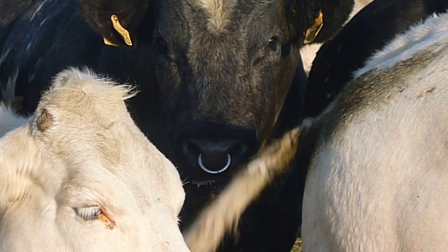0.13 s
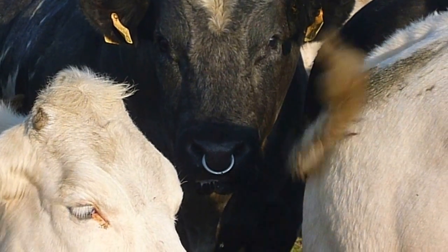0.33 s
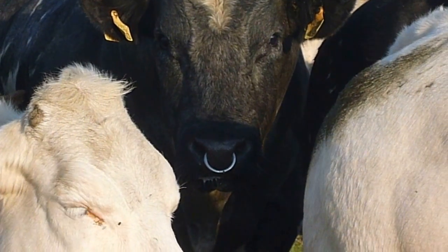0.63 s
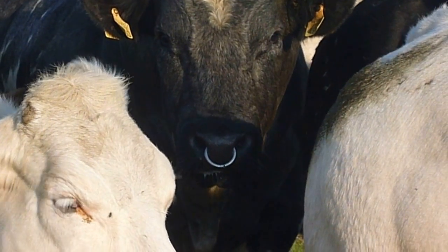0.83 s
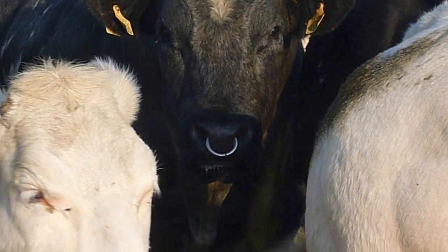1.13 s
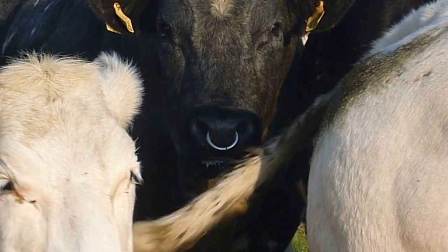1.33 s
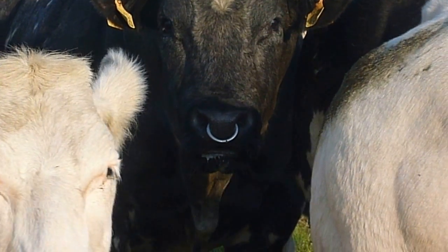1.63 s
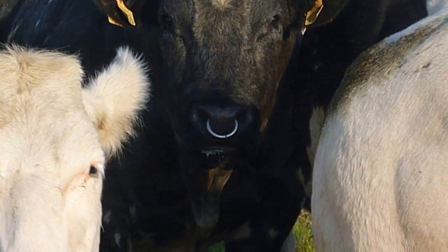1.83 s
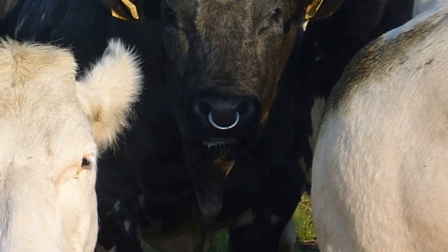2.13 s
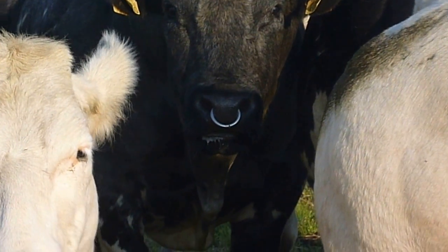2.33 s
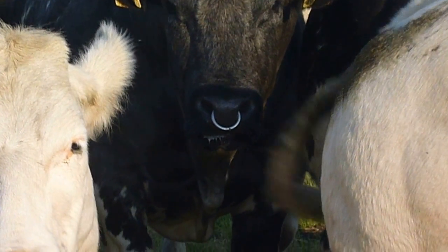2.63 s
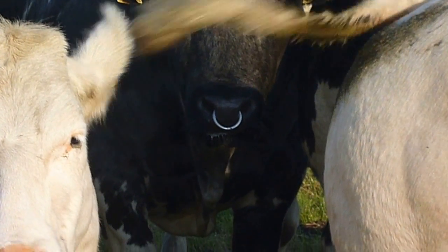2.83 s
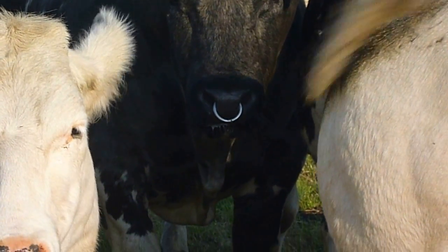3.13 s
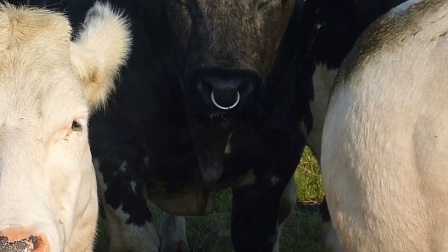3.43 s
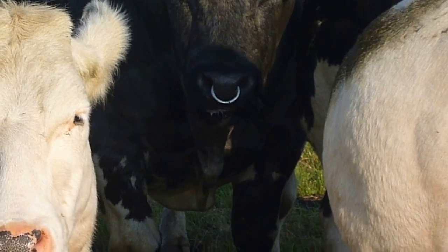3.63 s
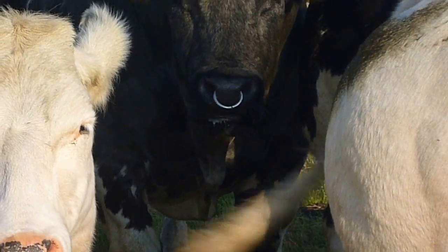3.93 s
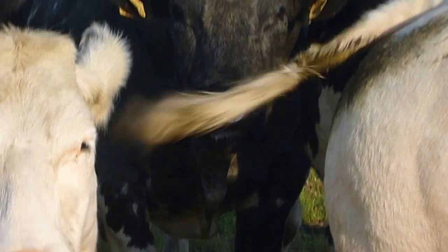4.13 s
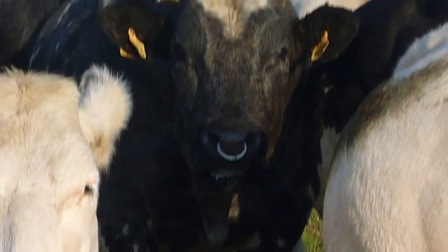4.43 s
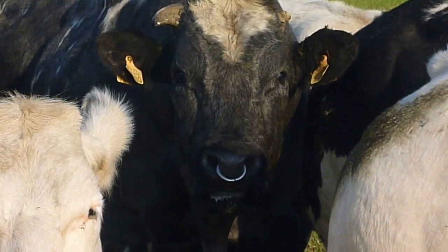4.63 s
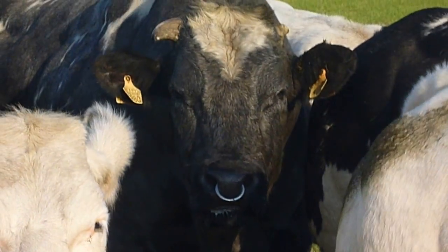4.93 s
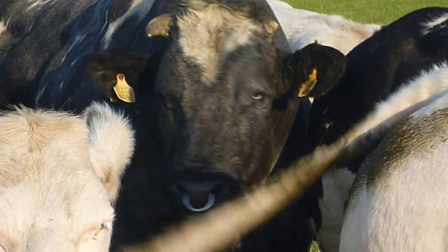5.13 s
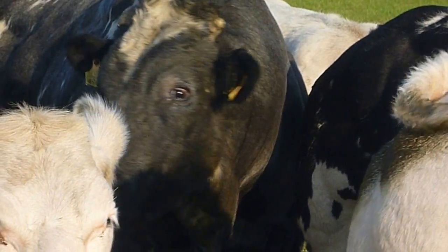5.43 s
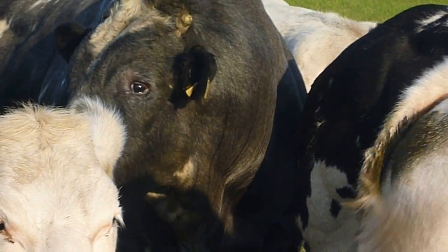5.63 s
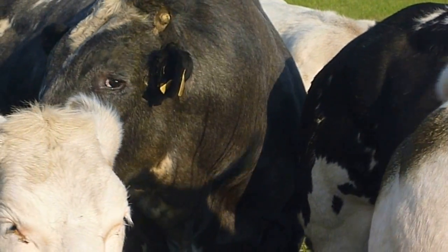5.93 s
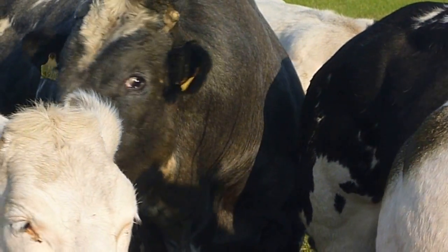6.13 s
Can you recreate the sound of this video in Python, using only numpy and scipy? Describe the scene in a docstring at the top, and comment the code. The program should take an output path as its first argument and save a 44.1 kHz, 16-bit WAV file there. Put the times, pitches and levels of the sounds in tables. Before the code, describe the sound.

A bull in an open pasture gives two long, low bellows with a short pause between them. Each starts as a nasal hum, swells and rises slightly in pitch, then drops and ends in a soft puff of air. Gusts rumble and thump on the microphone throughout, strongest after the second bellow. Small birds whistle and trill faintly in the distance over a quiet outdoor hush.

```python
"""Two long, nearly closed-mouthed bellows from a bull in a pasture, each ending in a puff of air.
His vocal folds hum through the nose and ring in the throat; effort raises the pitch and opens the jaw.
Gusts rumble on the microphone and single eddies hit it with soft thumps.
Small birds whistle and trill far off over a faint outdoor hush."""
import sys
import numpy as np
from scipy import signal
from scipy.io import wavfile
from scipy.ndimage import uniform_filter1d

SR = 44100
rng = np.random.default_rng(int(sys.argv[2]) if len(sys.argv) > 2 else 0)


def dump(signal):
    """Clip the signal to [-1, 1] and save it as 16-bit WAV at the path in sys.argv[1]."""
    limited = np.clip(np.atleast_2d(signal).T, -1, 1)
    pcm = np.round(limited * 32767).astype(np.int16)
    wavfile.write(sys.argv[1], SR, pcm)


N = 277381
TIME = np.arange(N) / SR


def bull():
    """Two bellows and the breath let out after each."""
    # per bellow, a pitch curve that climbs, sags and collapses: (time [s], pitch [Hz])
    pitch_curves = [
        [(.78, 86.5), (.88, 98.2), (1.25, 108.8), (1.45, 112.8), (1.82, 116.8), (2.14, 114.1), (2.27, 109.4),
         (2.33, 103.7), (2.365, 86.4)],
        [(3.29, 92), (3.45, 98.4), (3.81, 109.9), (4.01, 115.5), (4.3, 122.9), (4.55, 120.2), (4.74, 113.2),
         (4.81, 105.9), (4.85, 82)],
    ]
    # per bellow, boost of the lowest throat resonance and cut of the next: (lean [dB])
    leans_db = [1.5, -2.5]
    return sum(bellow(curve, lean_db) for curve, lean_db in zip(pitch_curves, leans_db)) + puffs()


def bellow(curve, lean_db, jaw_closed_hz=109, jaw_open_hz=116, jitter=0.0044, mouth_db_per_hz=0.3569):
    """Vocal folds sound through nose and mouth; effort follows the pitch."""
    pitch_hz, = in_time(curve)
    since_s = np.maximum(TIME - curve[0][0], 0)
    left_s = np.maximum(curve[-1][0] - TIME, 0)
    effort = np.maximum((pitch_hz - jaw_closed_hz) / (jaw_open_hz - jaw_closed_hz), 0)
    jaw = np.minimum(effort, 1)
    phase = 2 * np.pi * np.cumsum(pitch_hz * (1 + jitter * drift(45))) / SR
    # the hum swells, gives way under strain and surges as the mouth shuts
    swell_db = 11 * (ramp(since_s, 0.62) - 1)
    shut_db = 4 * np.exp(-(left_s / 0.042) ** 2)
    hum_db = -23.5 + swell_db - effort + shut_db + 0.5 * drift(12)
    hum = from_db(hum_db) * nasal_hum(phase, effort, jaw)
    mouth_db = -47 + mouth_db_per_hz * (pitch_hz - jaw_closed_hz) + 1.5 * effort
    mouth_gain = from_db(mouth_db) * ramp(since_s, 0.093) * ramp(left_s, 0.06)
    gate = ramp(since_s, 0.024) * ramp(left_s, 0.038)
    return gate * (hum + mouth_gain * mouth(phase, jaw, lean_db))


def nasal_hum(phase, effort, jaw, fall_db_per_harmonic=7):
    """The nose favours the second harmonic; strain brings out its neighbours."""
    hum = np.cos(2 * phase) + from_db(-8 + 4 * effort) * np.cos(phase)
    for k in (3, 4, 5):
        overtone_db = -21 + 7.5 * effort - fall_db_per_harmonic * (k - 3)
        hum += jaw ** 2 * from_db(overtone_db) * np.cos(k * phase)
    return -np.sqrt(2) * hum


def mouth(phase, jaw, lean_db, rasp=4.76, rasp_hz=2300, shimmer=0.059):
    """The folds snap shut once a cycle; air rushing between them takes over in the treble."""
    closures = np.diff(np.floor(phase / (2 * np.pi)), prepend=0)
    pulses = rms_one(cut(closures, 2600, "low", order=1))
    air = rms_one(cut(rng.standard_normal(N), rasp_hz, "high")) * (1 + 0.27 * np.cos(phase))
    source = pulses * (1 + shimmer * drift(40)) + rasp * air
    voice = cut(throat(source, jaw, lean_db), 330, "high", order=4)
    # hold the midrange level steady as the jaw moves
    mids = cut(voice, [680, 2200], "band", order=4)
    return voice / np.sqrt(uniform_filter1d(mids ** 2, size=4000) + 1e-12)


def throat(source, jaw, lean_db=0):
    """Resonances whose weight shifts upwards as the jaw opens from 0 to 1."""
    # throat resonances: (centre [Hz], width [Hz], gain jaw closed [dB], gain jaw open [dB])
    resonances = [(432, 50, 13.5, -9.5), (526, 51, 6.5, -16.5), (719.6, 36.7, 3.5, 9.5),
                  (836, 155, 1.5, -1), (924, 39, 4, 2.5), (1049, 9.7, -3.5, 4), (1279, 45, -15, 4),
                  (1423, 120, -8.5, -15), (1680, 130, -12, -8), (2025, 220, -21, -16),
                  (3334, 140, -31, -25.5), (4600, 170, -32, -25), (5430, 260, -37, -26),
                  (6280, 240, -42, -25)]
    out = 0
    for k, (hz, width_hz, closed_db, open_db) in enumerate(resonances):
        ring = resonate(source, hz, width_hz)
        if hz > 1550:  # deep valleys between the high ones
            ring = resonate(ring, hz, width_hz)
        gain_db = closed_db + jaw * (open_db - closed_db) + lean_db * ((k == 0) - (k == 1))
        out += (-1) ** k * from_db(gain_db) * ring
    return out


def puffs(jaw=0.44):
    """The folds part and the last air leaves through the throat."""
    # breaths: (time [s], 1/e half-width [s], level [dB])
    breaths = [(2.394, 0.022, -41), (4.869, 0.028, -37.5)]
    flow = sum(from_db(db) * np.exp(-((TIME - s) / width_s) ** 2) for s, width_s, db in breaths)
    air = throat(rng.standard_normal(N), jaw)
    return flow * rms_one(cut(air, [600, 1900], "band", order=1))


def wind(gain_db=0.5, bass_hz=80, lumpy_db=4, top_hz=620):
    """Lumpy turbulence on the microphone; a stronger gust sheds faster eddies and reaches higher."""
    gust_db = wind_strength()
    corner_hz = 225 * from_db(0.32 * (gust_db + 25))
    rumble, power = 0, 0
    for hz, band in noise_bands(13):
        gain = 1 / np.sqrt((1 + (hz / corner_hz) ** 10) * (1 + (bass_hz / hz) ** 4))
        rumble += gain * band
        power += gain ** 2 * np.var(band)
    lumps = rumble / np.sqrt(power) * from_db(lumpy_db * drift(50))
    # gust speed bounds the pressure swing; the rumble stays below about 620 Hz
    bounded = 2.8 * np.tanh(lumps / 2.8)
    return cut(bounded, top_hz, "low", order=5) * from_db(gain_db + gust_db)


def wind_strength(falloff_db=7, breeze_db=-45, flutter_db=3.7):
    """Wind level in dB: each gust swells and dies away over a fluttering breeze."""
    # gusts: (peak time [s], rise and fall time [s], level [dB])
    gusts = [(0.089, 0.056, -21.5), (0.231, 0.1, -24.5), (0.428, 0.047, -24.5), (1.24, 0.019, -32),
             (1.53, 0.034, -32), (1.66, 0.033, -22), (1.809, 0.031, -25), (1.961, 0.031, -23),
             (2.05, 0.028, -22), (2.339, 0.011, -22), (2.472, 0.039, -26.5), (2.83, 0.018, -32),
             (3.19, 0.045, -27.5), (3.5, 0.013, -24), (3.87, 0.11, -26.5), (4.3, 0.15, -20.5),
             (4.55, 0.025, -22.5), (4.771, 0.077, -25.5), (5.032, 0.068, -24.5), (5.256, 0.047, -16.5),
             (5.44, 0.052, -27.5), (5.619, 0.099, -23), (5.768, 0.014, -20), (6.019, 0.13, -16.5),
             (6.27, 0.016, -21)]
    gusts_db = [db - falloff_db * np.abs((TIME - s) / width_s) ** 1.14 for s, width_s, db in gusts]
    return np.max(gusts_db + [breeze_db + flutter_db * drift(9.8)], axis=0)


def buffets(gain_db=-0.5, reach_s=0.03):
    """An eddy passing the port is one swing of suction and pressure."""
    # hardest eddies on the microphone: (time [s], peak [dB], nominal frequency [Hz])
    eddies = [(.066, -14.5, 166), (0.149, -10, 189), (0.191, -14, 147), (.218, -24.5, 315),
              (0.267, -13.5, 198), (0.452, -30, 372), (1.233, -19.5, 131), (2.203, -5.5, 224),
              (3.181, -13.5, 158), (3.2, -24.5, 240), (3.27, -12, 163), (4.102, -14.5, 340),
              (4.327, -16, 175), (4.975, -11.5, 189), (5.037, -6.5, 300), (5.244, -17, 220),
              (5.335, -14.5, 171), (5.614, -16, 265), (5.66, -12.5, 246), (5.769, -17.5, 260),
              (5.886, -15, 249), (5.936, -14, 230), (5.97, -8.5, 222), (5.994, -10.5, 222),
              (6.033, -11, 254), (6.064, -14, 179), (6.124, -10.5, 228), (6.149, -16, 260)]
    thumps = np.zeros(N)
    for s, db, hz in eddies:
        span = slice(max(int((s - reach_s) * SR), 0), int((s + reach_s) * SR))
        phase = 2 * np.pi * hz * (TIME[span] - s)
        roundness = np.clip(1.5 * (-3.3 - db), 1.7, 10)  # softer eddies are rounder
        swing = phase / (1 + phase ** 2 / (2 * roundness)) ** roundness
        thumps[span] += from_db(gain_db + db) * swing / np.abs(swing).max()
    wake = 0.5 * resonate(thumps, hz=120, width_hz=220)
    return cut(thumps, 38, "high", order=1) + wake


def birds(gain_db=-0.05, waver=0.0044, fade_db_per_s=35):
    """Near-pure, slightly unsteady tones, each fading along its pitch track."""
    tracks = whistles() + trills()
    unsteady = 1 + waver * drift(60)
    out = np.zeros(N)
    for s, hz, db in tracks:
        n = len(hz)
        span = slice(int(s * SR), int(s * SR) + n)
        envelope = from_db(gain_db + db - fade_db_per_s * TIME[:n]) * signal.windows.tukey(n, 0.5)
        out[span] += envelope * np.sin(2 * np.pi * np.cumsum(hz * unsteady[span]) / SR)
    return out


def whistles(scoop=0.1, scoop_s=0.0071):
    """Notes that scoop up into an arch or a slide: (time [s], pitch track [Hz], level [dB])."""
    # one bird's three-note phrase: (delay [s], length [s], start [Hz], middle [Hz], end [Hz], gain [dB])
    phrase = [(0, 0.047, 3730, 3830, 3700, -4.5), (0.048, 0.06, 2970, 3410, 2660, 4.5),
              (0.102, 0.141, 2574, 2665, 2550, 6)]
    # each time it is sung: (time [s], level [dB])
    repeats = [(2.681, -54), (3.156, -55.5), (3.625, -58.5)]
    # other birds' notes: (time [s], length [s], start [Hz], middle [Hz], end [Hz], level [dB])
    chirps = [(.435, 0.021, 3240, 3580, 3230, -54), (0.804, 0.094, 2750, 2730, 2700, -56.5),
              (0.972, 0.069, 3130, 3430, 3430, -59), (1.07, 0.038, 4290, 3950, 3600, -58),
              (2.04, 0.07, 3700, 3420, 3650, -62), (2.225, 0.024, 3960, 4560, 5160, -59),
              (2.307, .023, 3980, 3850, 3440, -57), (2.335, 0.021, 4036, 4570, 5270, -56),
              (5.237, .1, 3300, 2850, 2680, -49.5), (5.546, 0.062, 3900, 3000, 2400, -49.5),
              (5.783, 0.094, 3850, 3630, 4000, -54.5)]
    song = [(s + delay_s, *shape, db + note_db)
            for s, db in repeats for delay_s, *shape, note_db in phrase]
    tracks = []
    for s, length_s, *contour_hz, db in song + list(chirps) + warble():
        t = TIME[:int(length_s * SR)]
        arch_hz = np.polyval(np.polyfit([0, 0.5, 1], contour_hz, 2), t / length_s)
        tracks.append((s, arch_hz * (1 - scoop * np.exp(-t / scoop_s)), db))
    return tracks


def warble(count=14, from_s=0.6, to_s=2.0, note_s=0.045, centre_hz=3900, spread_oct=0.28, slide_oct=0.17):
    """A distant warbler's short random slides, in rows like the chirps."""
    notes = []
    for s in np.linspace(from_s, to_s, count):
        late, stretch, high, slide, bend = rng.uniform(-1, 1, 5)
        contour_hz = centre_hz * 2 ** (spread_oct * high + slide_oct * np.array([-slide, bend, slide]))
        notes.append((s + late * note_s, note_s * np.exp(0.57 * stretch), *contour_hz, -60))
    return notes


def trills(waver=0.021):
    """Notes whose pitch swings rapidly: (time [s], pitch track [Hz], level [dB])."""
    # trilled notes: (time [s], length [s], pitch [Hz], swing [Hz], rate [Hz], level [dB])
    notes = [(4.93, .16, 2910, 153, 33, -50), (5.623, 0.083, 2810, 172, 150, -50)]
    tracks = []
    for s, length_s, hz, swing_hz, rate_hz, db in notes:
        t = TIME[:int(length_s * SR)]
        centre_hz = hz * (1 + waver * drift(150)[:len(t)])
        tracks.append((s, centre_hz + swing_hz * np.sin(2 * np.pi * rate_hz * t), db))
    return tracks


def hush(level_db=-44, flicker_db=1.1, swell_hz=850):
    """Far-off air and land noise: the midrange slowly swells and every band flickers slightly."""
    # hush spectrum: (frequency [Hz], relative density [dB])
    spectrum = [(30, 4.5), (90, 12.5), (200, -2.5), (350, -3.5), (800, -0.5), (1300, -6.5), (2000, -17),
                (2800, -20), (4500, -23), (6800, -23), (8400, -25.5), (9500, -42.5)]
    # midrange swell: (time [s], gain [dB])
    swell = [(0, -5.5), (.6, -1.5), (2.6, 1.5), (5.6, -1.2), (6.29, -1.5)]
    points_hz, points_db = np.transpose(spectrum)
    swell_db, = in_time(swell)
    out = 0
    for hz, band in noise_bands(18):
        band_db = np.interp(np.log(hz), np.log(points_hz), points_db)
        share = np.exp(-np.log(hz / swell_hz) ** 2)
        out += band * from_db(band_db + share * swell_db + flicker_db * drift(10))
    return rms_one(out) * from_db(level_db)


def field(x, t60_s, wet_db, delay_s=0.012):
    """Add faint, bass-free scatter from hedges and the herd."""
    t = TIME[:SR]
    tail = cut(rng.standard_normal(SR), 510, "high") * from_db(-60 * t / t60_s) * (t > delay_s)
    return x + from_db(wet_db) * signal.fftconvolve(x, tail / np.sqrt(np.sum(tail ** 2)))[:N]


def from_db(db):
    """Decibels to gain."""
    return 10 ** (np.asarray(db) / 20)


def rms_one(x):
    """Scale to unit rms."""
    return x / np.sqrt(np.mean(x ** 2) + 1e-20)


def ramp(t, length_s):
    """Linear rise from 0 to 1, then hold."""
    return np.clip(t / length_s, 0, 1)


def in_time(rows):
    """Each column of a curve at every sample."""
    s, *columns = np.transpose(rows)
    return [np.interp(TIME, s, c) for c in columns]


def drift(rate_hz, hop=40):
    """Smooth random motion of unit rms."""
    r = np.exp(-2 * np.pi * hop * rate_hz / SR)
    slow = signal.lfilter([1], [1, -2 * r, r * r], rng.standard_normal(N // hop + 2002))[2000:]
    return np.interp(np.arange(N) / hop, np.arange(len(slow)), rms_one(slow))


def resonate(x, hz, width_hz):
    """One resonance, unit peak gain."""
    r = np.exp(-np.pi * width_hz / SR)
    feedback = [1, -2 * r * np.cos(2 * np.pi * hz / SR), r * r]
    return signal.lfilter(np.array([1, 0, -1]) * (1 - r * r) / 2, feedback, x)


def cut(x, hz, kind, order=2):
    """Butterworth filter."""
    return signal.sosfilt(signal.butter(order, hz, kind, fs=SR, output="sos"), x)


def noise_bands(count):
    """Half-octave bands of white noise from 20 Hz up: (centre [Hz], signal)."""
    edges_hz = 20 * 2 ** (np.arange(count + 1) / 2)
    white = rng.standard_normal((2, N))
    return [(np.sqrt(low * high), cut(white[k % 2], [low, high], "band", order=3))
            for k, (low, high) in enumerate(zip(edges_hz, edges_hz[1:]))]


def scene():
    """Bull and birds in the open field, wind on the microphone; mono."""
    bellows = field(bull(), t60_s=0.6, wet_db=-8)
    birdsong = field(birds(), t60_s=0.4, wet_db=-8.5)
    return (bellows + birdsong + hush() + wind() + buffets())[None]


def record(dry, ceiling=0.42, offset=0.023, dull_hz=7700, cutoff_hz=10300):
    """The hardest thumps overload the input, which sits off zero; the treble rolls off and is cut."""
    limited = dry / (1 + (dry / ceiling) ** 12) ** (1 / 12)
    dulled = cut(limited, dull_hz, "low", order=4)
    return signal.sosfilt(signal.cheby2(12, 60, cutoff_hz, fs=SR, output="sos"), dulled) + offset


dry = scene()
out = record(dry)
dump(out)
```